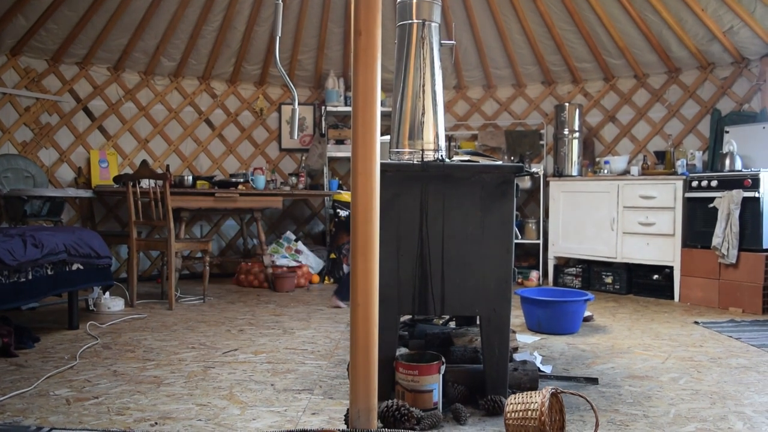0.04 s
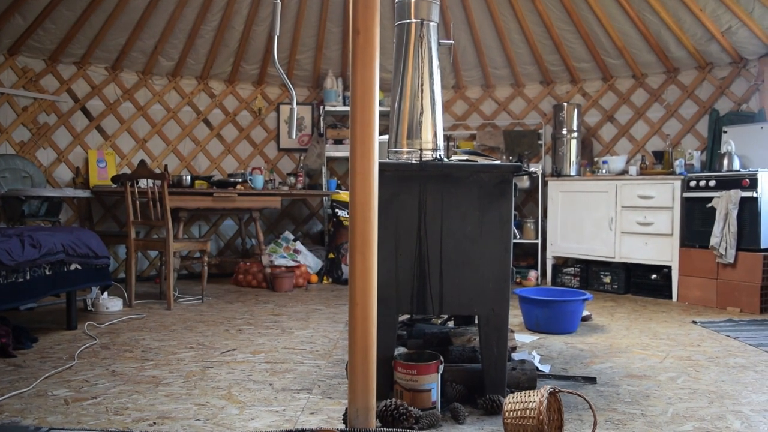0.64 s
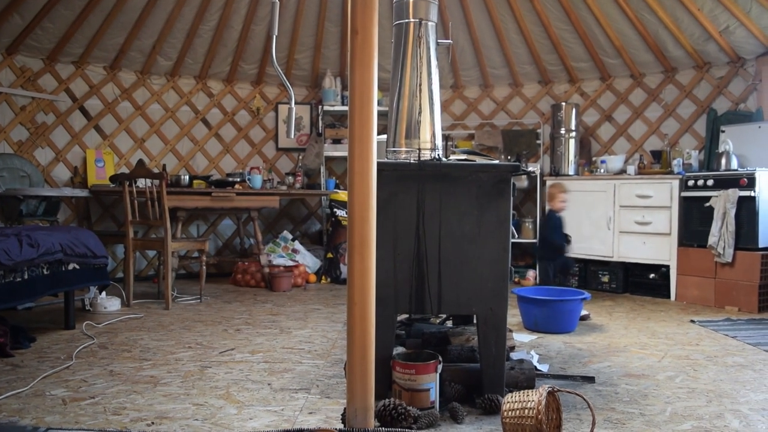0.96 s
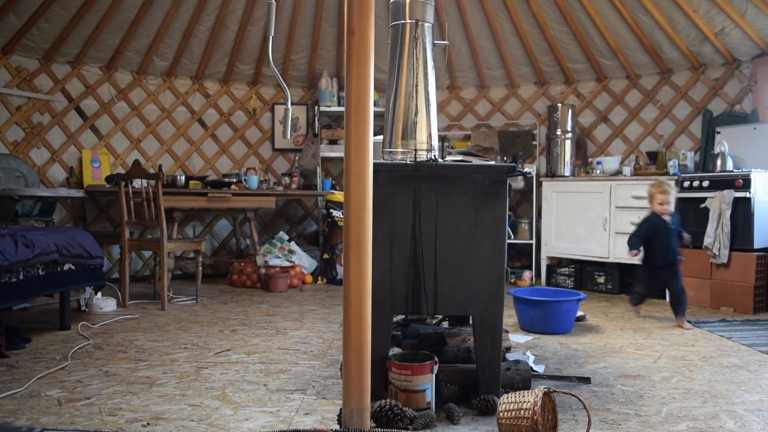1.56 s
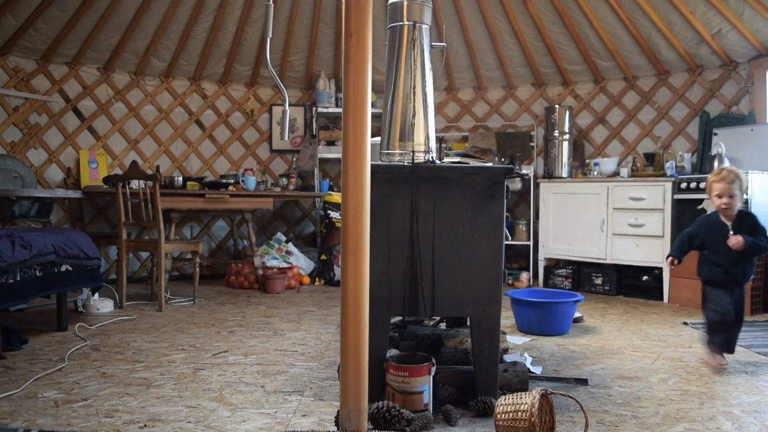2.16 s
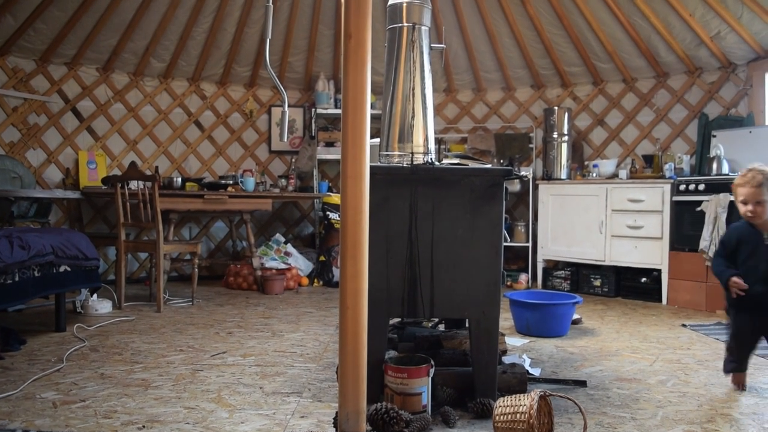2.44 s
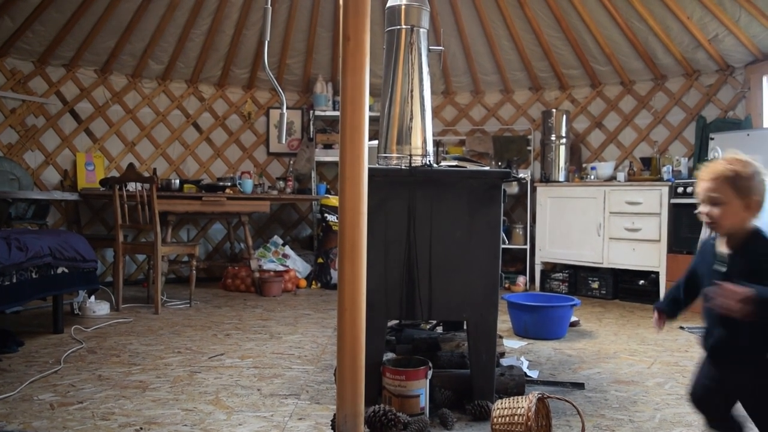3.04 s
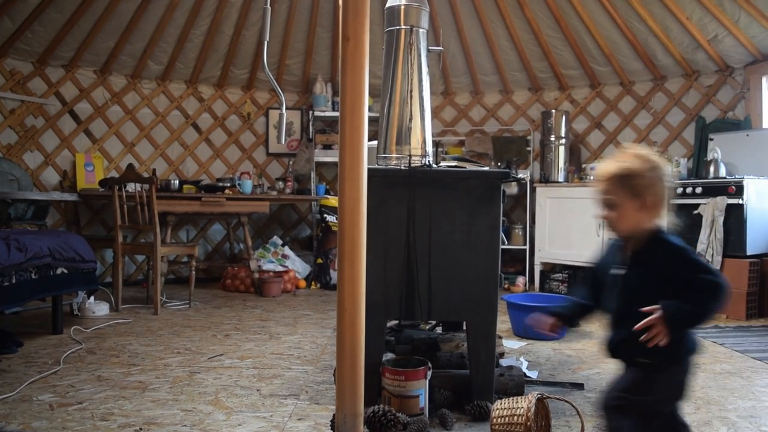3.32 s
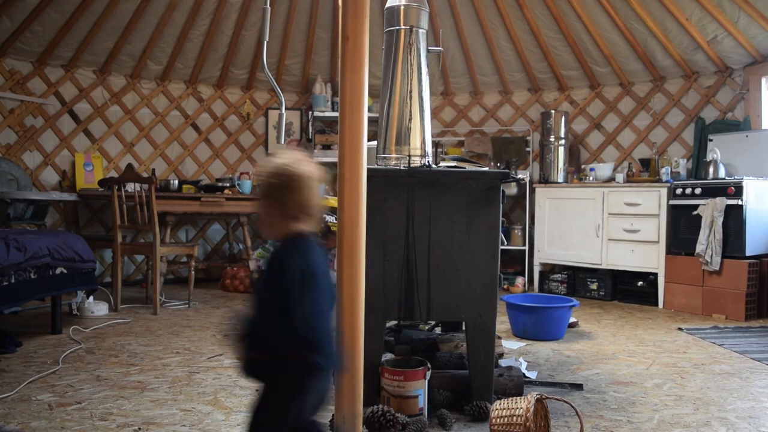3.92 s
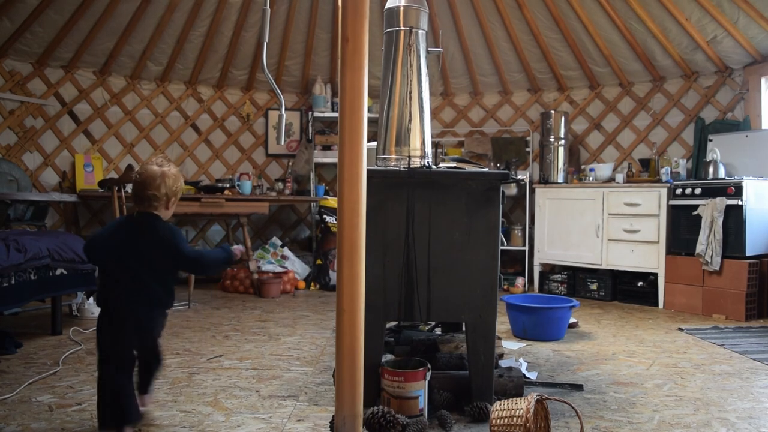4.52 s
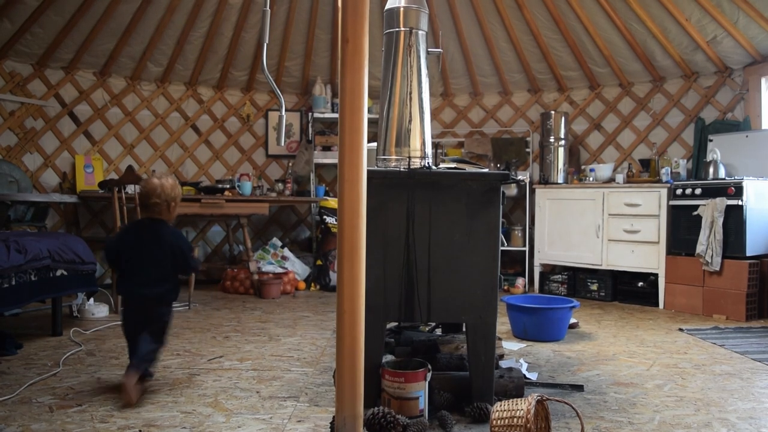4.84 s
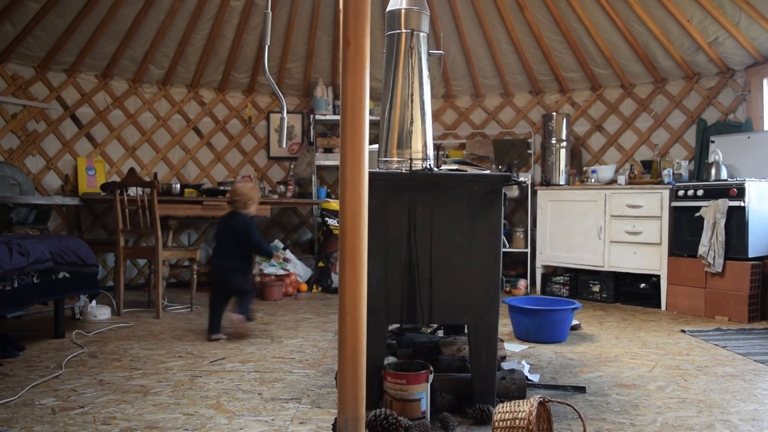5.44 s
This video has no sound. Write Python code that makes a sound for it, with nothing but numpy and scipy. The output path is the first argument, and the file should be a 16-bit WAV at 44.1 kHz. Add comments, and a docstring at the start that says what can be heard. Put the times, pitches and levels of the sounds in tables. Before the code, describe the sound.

A toddler's bare feet run across a hollow wooden floor indoors, thumping and slapping over a faint hiss.

```python
"""Over a steady microphone hiss, quick bare footsteps: a toddler runs a lap around a stove
on a hollow chipboard floor, in a round, felt-walled room. Each step is a slap of skin; the weight
sags the deck and sets one board ringing and knocking on its joists. Toes tap after the heel and
furniture rattles. Scuffs, clatter, hollow knocks, grit, a loose board and a two-tone squeak join in."""
import sys
import numpy as np
from scipy import signal
from scipy.fft import rfft, irfft, next_fast_len
from scipy.io import wavfile
from scipy.ndimage import map_coordinates

SR = 44100
rng = np.random.default_rng(int(sys.argv[2]) if len(sys.argv) > 2 else 0)


def unload_wav(signal):
    """Save mono or channel-first audio to the path in sys.argv[1] as 16-bit WAV at rate SR, clipped to [-1, 1]."""
    wavfile.write(
        sys.argv[1],
        SR,
        np.round(np.clip(np.atleast_2d(signal).T, -1, 1) * 32767).astype(np.int16),
    )


N = 250047
LEAD_S = 0.02
T = np.arange(round(0.6 * SR)) / SR - LEAD_S  # time since contact, s


def amp(db):
    """Decibels to gain."""
    return 10 ** (np.asarray(db) / 20)


def along(points, hz):
    """Interpolate (f/Hz, value) points on a log frequency axis."""
    f, value = np.transpose(points)
    return np.interp(np.log(hz + 1), np.log(f + 1), value)


def filtered(x, response):
    """Apply a gain given as a function of frequency."""
    n = x.shape[-1]
    padded = next_fast_len(n + 4096)
    return irfft(rfft(x, padded) * response(np.fft.rfftfreq(padded, 1 / SR)), padded)[..., :n]


def noise(colour, coherence=((0, 1),), size=len(T)):
    """Coloured stereo noise, rms 1; left-right coherence as (f/Hz, 0-1) points, mono by default."""
    def mid_side_gains(f):
        angle = np.arccos(np.clip(along(coherence, f), 0, 1)) / 2
        return colour(f) * np.array([np.cos(angle), np.sin(angle)])
    mid, side = filtered(rng.standard_normal((2, size)), mid_side_gains)
    pair = np.array([mid + side, mid - side])
    return pair / pair.std()


def resonance(hz, q, top_hz):
    """Colour of a broad resonance, rolled off above top_hz."""
    def response(f):
        ratio = (f + 1) / hz
        return 1 / np.sqrt((1 + (q * (ratio - 1 / ratio)) ** 2) * (1 + (f / top_hz) ** 6))
    return response


def wander(rate_hz):
    """Random curve through rate_hz Gaussian points a second."""
    return map_coordinates(rng.standard_normal(len(T)), [np.arange(len(T)) * rate_hz / SR], order=1)


def fade(rise_s, t60_s, delay_s=0):
    """Smooth attack around the delay, then exponential decay."""
    t = T - delay_s
    attack = (1 + np.tanh(t / rise_s)) / 2
    return attack * np.exp(-np.log(1000) * np.maximum(t, 0) / t60_s)


def at_level(x, db):
    """Set the rms level over the 40 ms of impact."""
    impact = (T > -0.004) & (T < 0.036)
    return amp(db) * x / np.sqrt(np.mean(x[..., impact] ** 2) + 1e-20)


def add(track, t, sound):
    """Mix in a sound with its contact at t seconds."""
    start = round((t - LEAD_S) * SR)
    count = min(len(T), N - start)
    track[:, start:start + count] += sound[..., :count]


# noise floor: f/Hz, relative density/dB
HISS_SPECTRUM = [(12, -31), (20, 5), (90, -3.5), (157, -6.5), (180, -4.5), (232, -9.5), (289, -8.5),
                 (352, -9), (534, -13.5), (597, -15.5), (649, -13), (857, -14.5), (1010, -15), (2090, -17),
                 (15500, -19.5)]
# left-right likeness: f/Hz, coherence/0-1
HISS_COHERENCE = [(100, 0.99), (400, 0.86), (1200, 0.69), (4000, 0.65), (14000, 0.37)]
def hiss(db=-60.22):
    """Microphone hiss over the faint rumble of the room."""
    return amp(db) * noise(lambda f: amp(along(HISS_SPECTRUM, f)), HISS_COHERENCE, size=N)


# first contact, before pitch shift: f/Hz, relative level/dB
SNAP_SPECTRUM = [(700, 8), (1500, -1.5), (2200, -9), (2900, -1.5), (3700, 2.5), (4700, 3), (6000, -16.5),
                 (8000, -21), (12000, -42), (16000, -51)]
# skin patter, before pitch shift: f/Hz, relative level/dB
SKIN_SPECTRUM = [(900, -14), (1500, -7.5), (2200, -1.5), (3000, 1), (3800, 3), (4800, -1), (6000, -6.5),
                 (8000, -14), (12000, -22), (16000, -17)]
# bright chipboard modes: f/Hz, relative level/dB, t60/s
CHIPBOARD_MODES = [(2800, -41, 0.025), (3200, 18, 0.043), (3850, -13.5, 0.24), (4440, 14, 0.029),
                   (4530, -14, 0.18), (4600, 2, 0.2)]
def slap(db, patter_db, peak_hz):
    """The sole snaps onto the board; toes and nearby furniture smear it into a short patter."""
    unshifted_peak_hz = 3800
    shift = unshifted_peak_hz / peak_hz
    skin = lambda f: amp(along(SKIN_SPECTRUM, f * shift))
    snap = noise(lambda f: amp(along(SNAP_SPECTRUM, f * shift))) * fade(0.00036, t60_s=0.0069)
    ring = np.zeros(len(T))
    for hz, mode_db, t60_s in CHIPBOARD_MODES:
        gain = amp(mode_db + rng.normal(0, 2))
        ring += gain * np.sin(2 * np.pi * (hz * T + rng.random())) * fade(0.00025, t60_s)
    ring = skin(unshifted_peak_hz) * at_level(ring, db - 25)  # a dull slap hardly rings
    grain = amp(2 * wander(rate_hz=600))
    patter = noise(skin) * grain * fade(0.0037, t60_s=0.15, delay_s=0.00039)
    return at_level(snap, db - 11.5) + ring + at_level(patter, patter_db)


def knock(db, far_db):
    """The board knocks on its joists and the room answers."""
    wood = noise(resonance(hz=400, q=1.1, top_hz=1590), coherence=[(300, 1), (1200, 0.98)])
    direct = fade(0.00048, t60_s=0.13)
    room = amp(far_db - 16) * fade(0.03, t60_s=0.24)
    return at_level(wood * (direct + room), db)


def floor_mode(hz, load_s):
    """A floor mode, pushed furthest down when the full weight arrives at load_s."""
    return -np.cos(2 * np.pi * hz * (T - load_s))


def thump(deck_db, deck_hz, board_db, board_hz, far_db):
    """The deck and one board ring; the rest of the floor rumbles on, more so from afar."""
    deck = floor_mode(deck_hz, load_s=0.0046) * fade(0.0026, t60_s=0.1, delay_s=0.0066)
    board = floor_mode(board_hz, load_s=0.00386) * fade(0.0041, t60_s=0.055, delay_s=0.0035)
    overtone = floor_mode(board_hz * 1.824, load_s=0.00388) * fade(0.0015, t60_s=0.044, delay_s=0.001)
    spread = noise(resonance(board_hz * 0.84, q=2.55, top_hz=board_hz * 1.7))
    spread *= fade(0.0092, t60_s=0.26, delay_s=0.005)
    sway = noise(resonance(hz=50, q=0.82, top_hz=113)) * fade(0.0093, t60_s=0.4, delay_s=0.0025)
    ring = at_level(deck, deck_db + 0.1) + at_level(board, board_db - 0.3)
    rumble = at_level(spread, board_db - 5.5 + far_db) + at_level(sway, deck_db - 9.5 + 1.3 * far_db)
    return ring + at_level(overtone, board_db - 22.5) + rumble


def tap(db, hz):
    """A light contact rings in a narrow band."""
    return at_level(noise(resonance(hz, q=3.1, top_hz=hz * 1.4)) * fade(0.0029, t60_s=0.16), db)


# child's distance: t/s, distance/m
LAP_DISTANCE = [(0, 5.9), (1.2, 8.7), (2.2, 7.5), (2.9, 3.3), (3.5, 0.48), (4.3, 1.7), (4.9, 2.5),
                (5.6, 5.1)]
# flat, soft landings in the turn: t/s, softness/0-1
FOOT_SOFTNESS = [(2.7, 0), (2.94, 0.64), (3.4, 1), (4.3, 1), (4.6, 0)]
# footfalls, nominal levels: t/s, deck/dB, board/dB, board f/Hz, slap/dB
FOOTFALLS = [(0.124, -53, -47, 158, -61), (0.383, -59.5, -53, 141, -58), (0.609, -46.5, -44.5, 208, -63),
             (0.868, -51, -49.5, 134.3, -57.5), (1.105, -50, -42, 130, -50.5),
             (1.338, -52, -51, 161, -50.5), (1.57, -48, -39, 170.4, -45), (1.804, -51.5, -49, 169, -59),
             (2.026, -48.5, -46, 152, -53.5), (2.264, -53, -55, 136, -54.5),
             (2.481, -47, -42.5, 175, -43.5), (2.715, -64.5, -64, 174, -59),
             (2.938, -50.5, -43, 158, -49.5), (3.417, -32, -35.5, 158.4, -70), (3.66, -56, -74, 168, -75),
             (3.861, -46.5, -46, 126, -48), (4.102, -59, -58.5, 144, -72), (4.351, -46.5, -48, 155, -70),
             (4.608, -42, -43, 183, -59), (4.847, -42.5, -40, 178, -38), (5.094, -45.5, -47, 160, -57.5),
             (5.332, -40, -36.5, 172, -37), (5.604, -48, -47.5, 145, -51.5)]
def footsteps():
    """Weight drives thump, knock, toe tap and rattle; the slap drives patter; soft steps are duller."""
    track = np.zeros((2, N))
    for t, deck_db, board_db, board_hz, slap_db in FOOTFALLS:
        distance_m = np.interp(t, *np.transpose(LAP_DISTANCE))
        far_db = 14 * np.log10(distance_m / 3)  # the tail's share grows with distance
        softness = np.interp(t, *np.transpose(FOOT_SOFTNESS))
        deck_hz = np.interp(softness, [0, 1], [81, 74.3])
        slap_hz = np.interp(softness, [0, 1], [4040, 1290])
        heavy_db, sharp_db = board_db + 42, slap_db + 48.5  # relative to an ordinary step
        knock_db = -60.84 + 0.38 * heavy_db + 0.18 * sharp_db - 0.17 * far_db
        patter_db = -61.8 + 0.89 * sharp_db + 0.78 * far_db
        add(track, t, thump(deck_db, deck_hz, board_db, board_hz, far_db))
        add(track, t, knock(knock_db + 1.5 * softness, far_db))  # a flat foot knocks harder
        add(track, t, slap(slap_db, patter_db, slap_hz))
        add(track, t + 0.0304, tap(deck_db - 10, hz=100))  # toes follow the heel
        for rattle_hz, rattle_db in [(340, -24.5), (900, -33)]:  # shaken furniture
            lag_s = 0.04 * (0.5 + rng.random())
            add(track, t + lag_s, tap(board_db + rattle_db + 0.77 * far_db, rattle_hz))
    return track


# sole strokes: centre t/s, half-width/s, level/dB
SCUFF_STROKES = [(0.137, 0.016, -56.5), (0.618, 0.015, -57.5), (5.093, 0.073, -65.5), (5.19, 0.039, -64),
                 (5.264, 0.021, -69)]
# skin friction: f/Hz, relative level/dB
SCUFF_SPECTRUM = [(900, -28), (2200, 0), (3200, -2.5), (4000, 4), (5000, -2), (6500, -6), (9000, -15),
                  (16000, -17)]
def scuffs():
    """Skin brushes softly across the chipboard."""
    t = np.arange(N) / SR
    strokes = sum(amp(db) * np.exp(-((t - centre_s) / half_width_s) ** 2)
                  for centre_s, half_width_s, db in SCUFF_STROKES)
    return strokes * noise(lambda f: amp(along(SCUFF_SPECTRUM, f)), size=N)


# loose objects: t/s, level/dB, f/Hz
CLATTER_HITS = [(.453, -61.5, 367), (0.693, -66.5, 1010), (1.592, -61.5, 1000), (1.611, -48, 168),
                (2.32, -60, 250), (2.505, -55.5, 370)]
def clatter():
    """Loose things in the room knock lightly as the floor shakes."""
    track = np.zeros((2, N))
    for t, db, hz in CLATTER_HITS:
        add(track, t, tap(db, hz))
    return track


def struck(hits, modes, rise_s, blur_rad):
    """An object rings with the same modes at every hit, blurred by wandering phase."""
    track = np.zeros((2, N))
    for t, hit_db in hits:
        for hz, mode_db, t60_s in modes:
            phase = 2 * np.pi * hz * T + blur_rad * wander(rate_hz=110)
            add(track, t, at_level(np.sin(phase) * fade(rise_s, t60_s), hit_db + mode_db))
    return track


# knocks on a hollow body: t/s, level/dB
HOLLOW_KNOCKS = [(.611, -42), (.628, -42.5), (.688, -59)]
# its modes: f/Hz, relative level/dB, t60/s
HOLLOW_MODES = [(231, -11.5, 0.11), (268, -0.5, 0.1), (305, -12.5, 0.24), (377, -13, 0.53),
                (520, -13.5, .2), (594, -14.5, 0.05), (778, -23, 0.1), (1095, -24, 0.21)]
def hollow_knocks():
    """Something hollow is knocked behind the stove and rings."""
    return struck(HOLLOW_KNOCKS, HOLLOW_MODES, rise_s=0.006, blur_rad=1)


# specks underfoot: t/s, level/dB
GRIT_CLICKS = [(1.573, -70), (2.0274, -65.5), (2.9387, -66), (5.3329, -63)]
def grit():
    """Specks of grit click between skin and board."""
    track = np.zeros((2, N))
    for t, db in GRIT_CLICKS:
        click = noise(resonance(hz=7000, q=0.21, top_hz=11000)) * fade(0.00022, t60_s=0.0071)
        add(track, t, at_level(click, db))
    return track


# steps on a loose board: t/s, level/dB
LOOSE_BOARD_HITS = [(4.847, -48.5), (5.333, -53.5)]
# its modes: f/Hz, relative level/dB, t60/s
LOOSE_BOARD_MODES = [(473, -7, 0.043), (702, 0.5, 0.069), (825, -7, 0.071), (2914, -13, .025),
                     (3660, -6, .03), (4350, -6, 0.014)]
def loose_board():
    """A loose board clacks under the foot."""
    return struck(LOOSE_BOARD_HITS, LOOSE_BOARD_MODES, rise_s=0.00057, blur_rad=0.43)


# squeak tones: t/s, length/s, level/dB, start f/Hz, end f/Hz
SQUEAK_TONES = [(5.014, 0.041, -56, 700, 830), (5.033, 0.037, -56, 343, 496)]
def squeak():
    """Two faint tones swell and glide upward, blurred by the room."""
    track = np.zeros((2, N))
    for t, length_s, db, start_hz, end_hz in SQUEAK_TONES:
        progress = np.clip(T / length_s, 0, 1)
        phase = 2 * np.pi * np.cumsum(start_hz + (end_hz - start_hz) * progress) / SR
        add(track, t, amp(db) * np.sin(np.pi * progress) * np.sin(phase))
    room = noise(np.ones_like, coherence=[(600, 0.99)]) * fade(0.003, t60_s=0.11, delay_s=0.008)
    room = room[:, T > 0]
    reverb = signal.fftconvolve(track, room / np.linalg.norm(room[0]), axes=1)[:, :N]
    return track + amp(-6.5) * reverb


def scene():
    """The running child in the quiet room."""
    ringing = hollow_knocks() + loose_board()
    return footsteps() + grit() + ringing + clatter() + squeak() + scuffs() + hiss()


def record(dry):
    """Brick-wall low-pass at 15750 Hz."""
    return filtered(dry, lambda f: f < 15750)


dry = scene()
out = record(dry)
unload_wav(out)
```